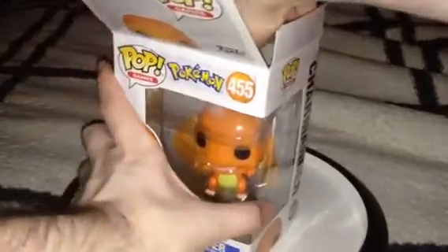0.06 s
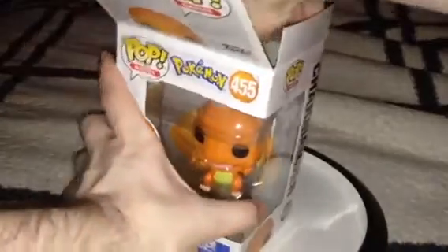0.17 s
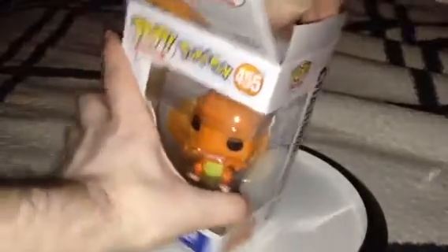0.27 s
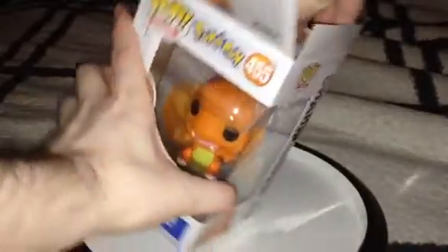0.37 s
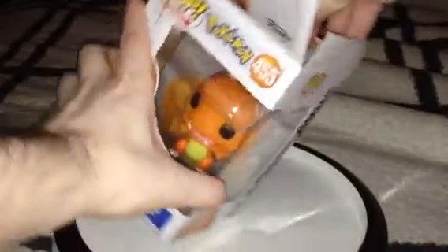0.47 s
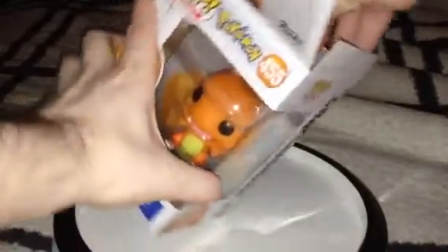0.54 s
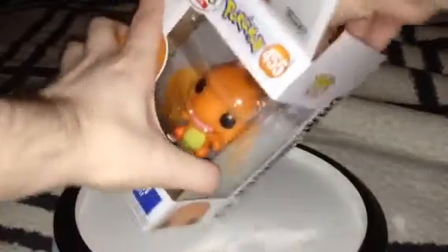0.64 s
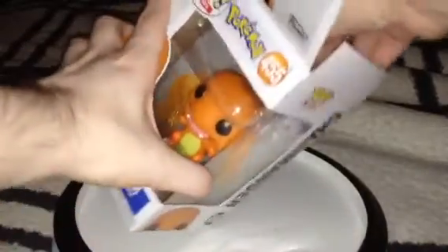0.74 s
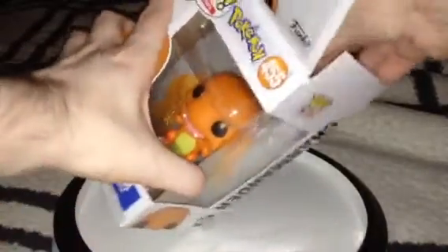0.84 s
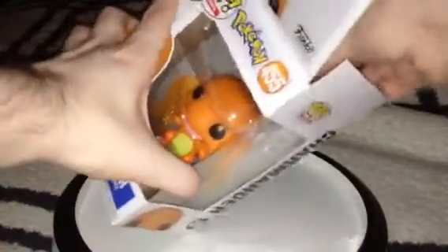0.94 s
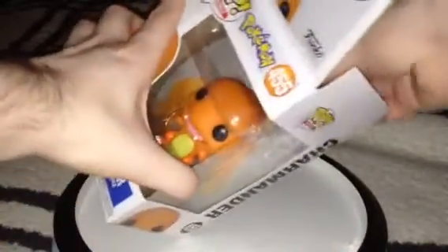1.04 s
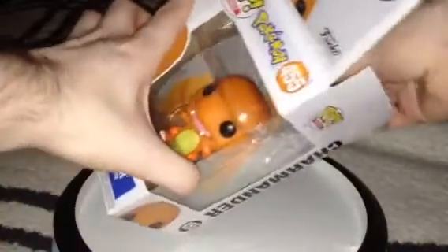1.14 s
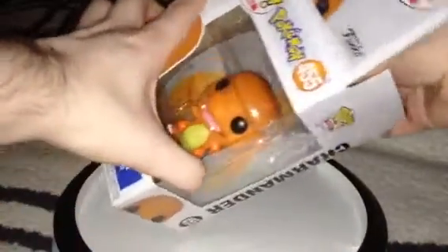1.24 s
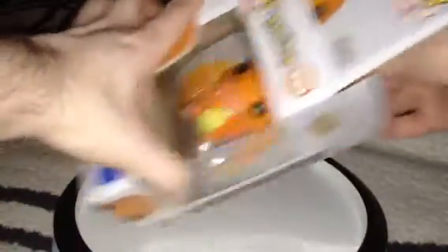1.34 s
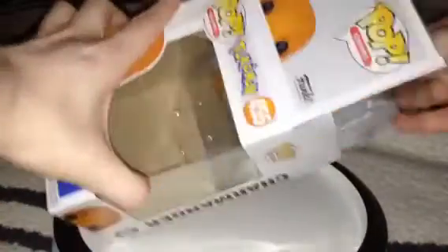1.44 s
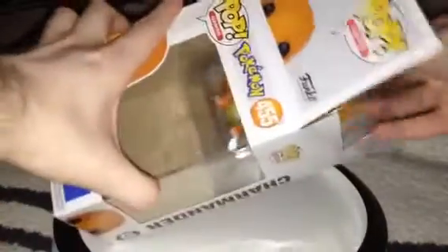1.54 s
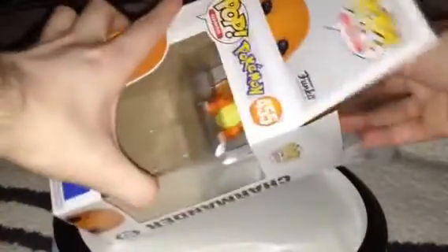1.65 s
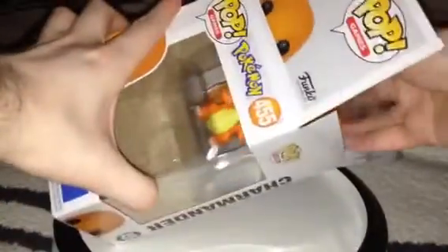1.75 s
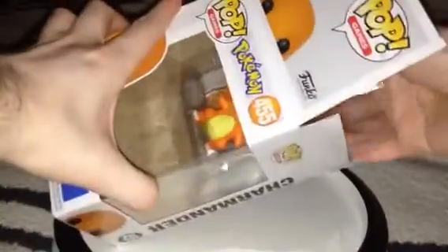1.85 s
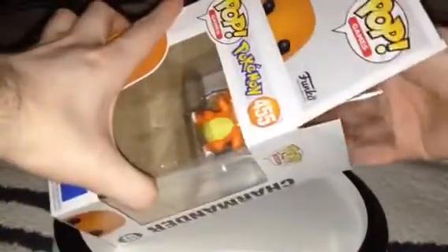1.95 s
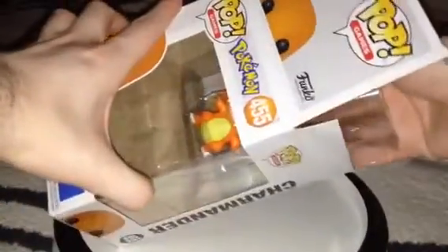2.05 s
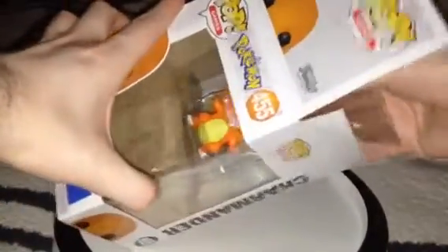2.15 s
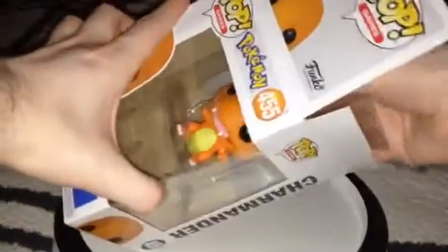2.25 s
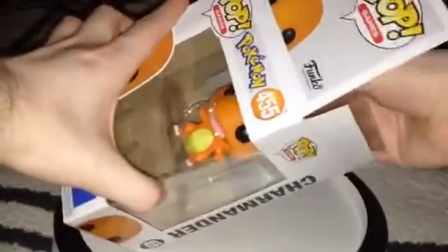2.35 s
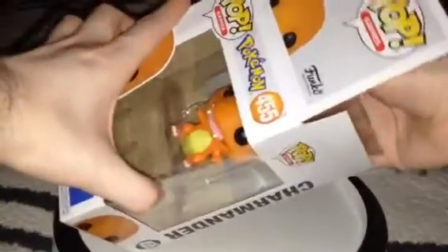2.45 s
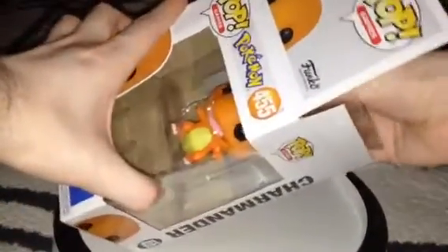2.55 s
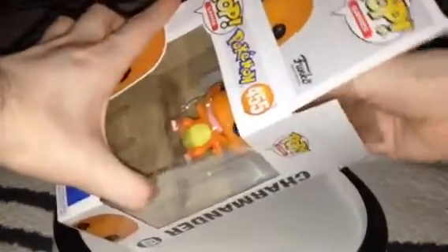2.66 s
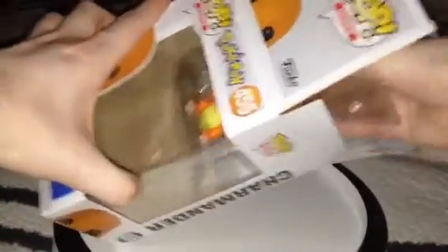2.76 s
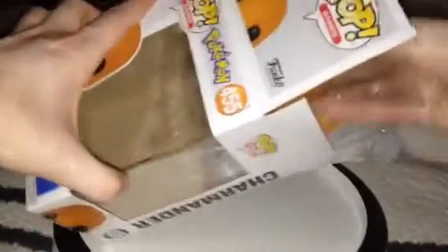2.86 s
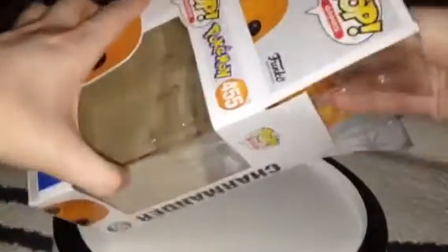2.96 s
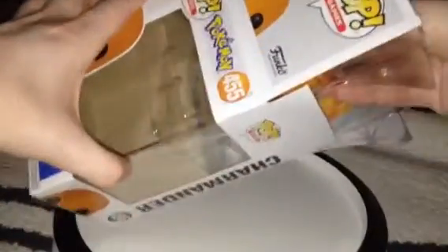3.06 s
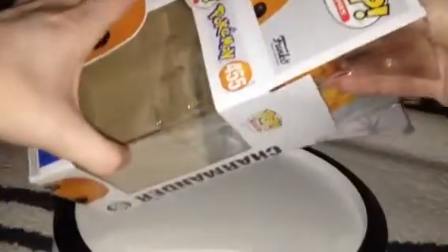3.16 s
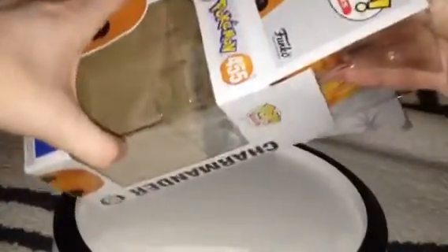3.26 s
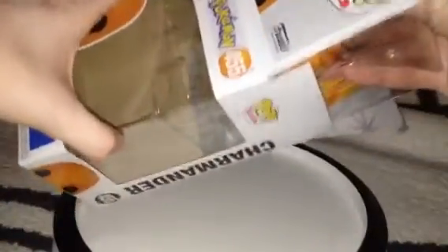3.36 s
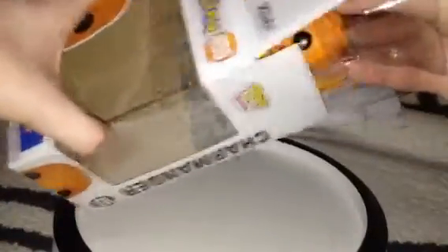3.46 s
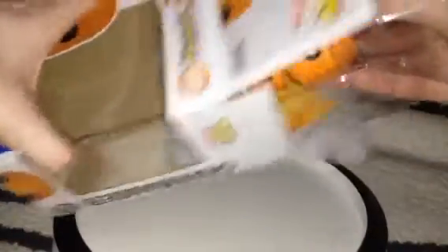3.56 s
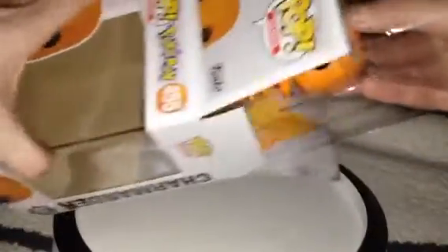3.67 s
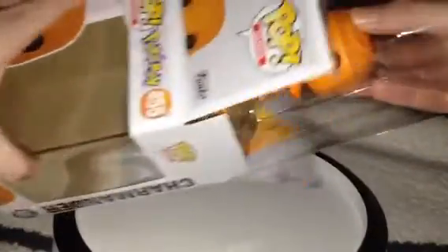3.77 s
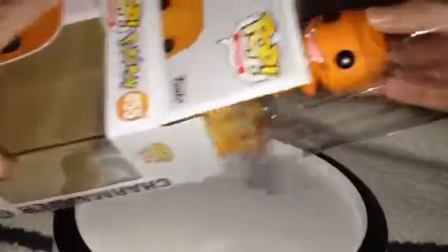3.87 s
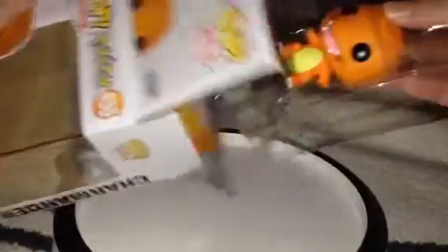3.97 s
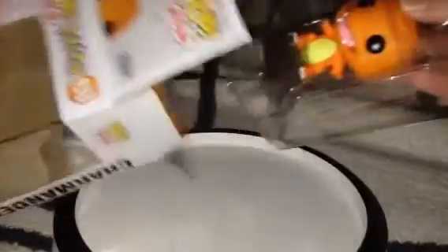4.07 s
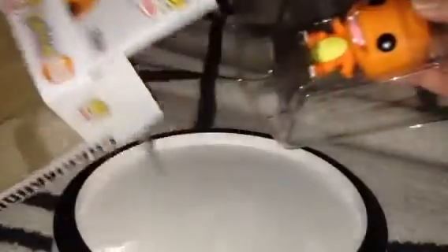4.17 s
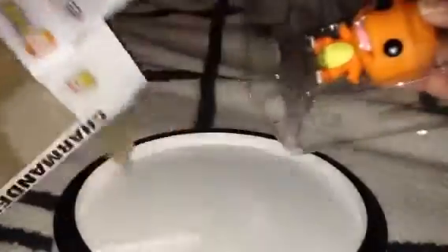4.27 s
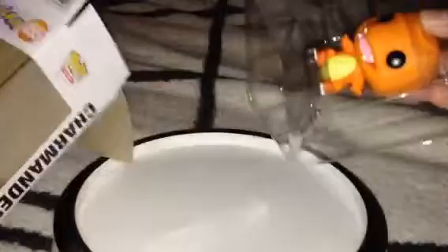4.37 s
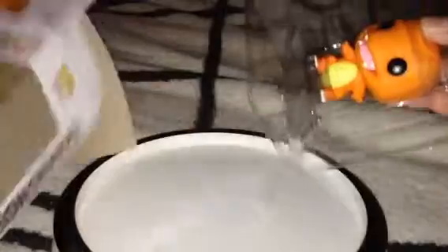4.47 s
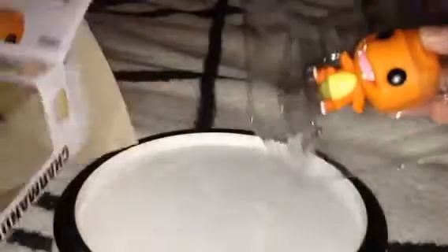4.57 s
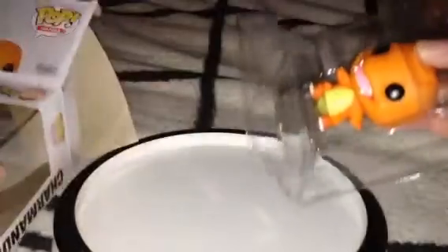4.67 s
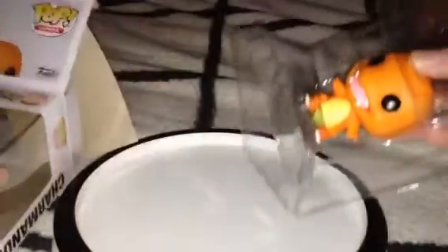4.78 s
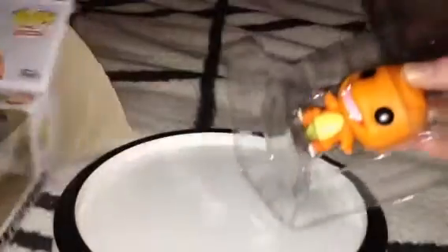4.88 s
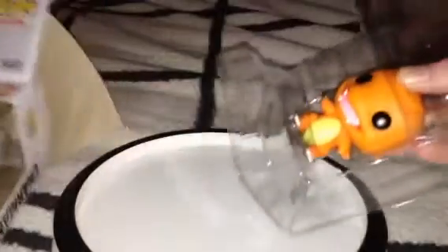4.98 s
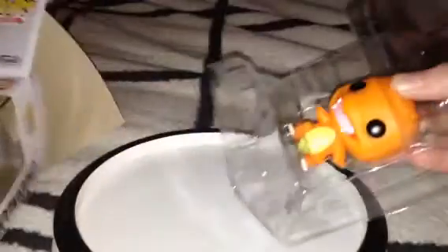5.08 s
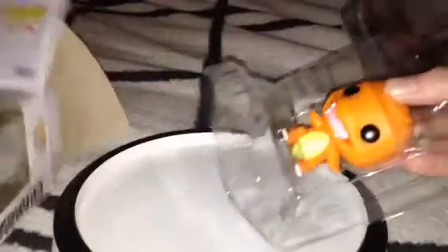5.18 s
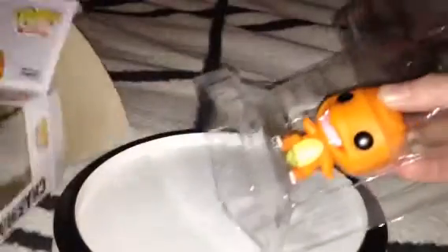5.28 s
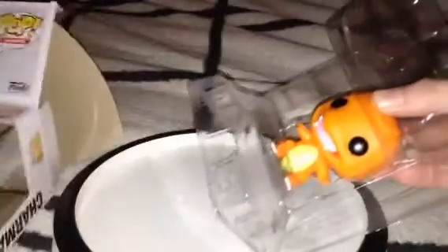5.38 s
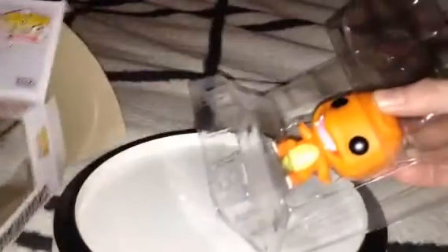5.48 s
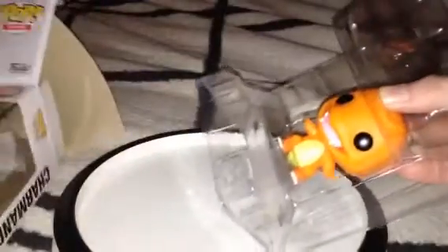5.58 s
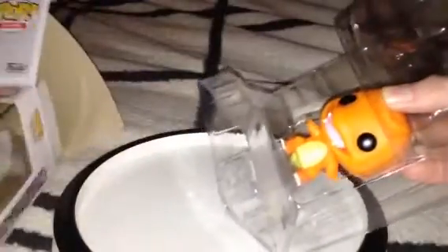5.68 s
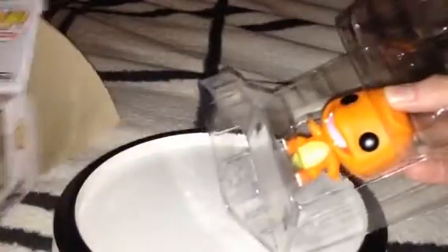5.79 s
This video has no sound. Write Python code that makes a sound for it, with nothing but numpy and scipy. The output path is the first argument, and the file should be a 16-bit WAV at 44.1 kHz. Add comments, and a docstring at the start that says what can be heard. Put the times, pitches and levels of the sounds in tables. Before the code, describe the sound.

Hands handle a cardboard toy box up close; a sharp plastic snap, then scrapes, knocks and crackles as a clear tray slides out.

```python
"""Toy box opened by hand

Hands open a cardboard toy box and work a clear plastic tray out of it, heard close up in a small, soft room.
Card knocks, tray snaps and dry ticks are short noise runs that ring the box; rubs, scrapes and hisses are
stick-slip noise through the same box. Thin gliding squeaks and faint whistles are noise through a narrow
moving resonance. Low panel hums and a room rumble complete it."""
import sys
import numpy as np
from scipy import signal
from scipy.fft import rfft
from scipy.io import wavfile
from scipy.ndimage import uniform_filter1d

SR = 44100
rng = np.random.default_rng(int(sys.argv[2]) if len(sys.argv) > 2 else 0)


def wav_out(sig):
    """Save sig, one row per channel (or a flat mono array), as 16-bit PCM at SR to the path in sys.argv[1]."""
    wavfile.write(sys.argv[1], SR, np.round(np.clip(np.atleast_2d(sig).T, -1, 1) * 32767).astype(np.int16))


N = 256640
SIZE = 4096  # filter design length in samples
HZ = np.fft.rfftfreq(SIZE, 1 / SR)


def amp(db):
    """Decibels to gain."""
    return 10 ** (np.asarray(db) / 20)


def evened(x):
    """Scales to rms 1."""
    return x / np.sqrt(np.mean(x ** 2) + 1e-20)


def read(points, hz):
    """Reads (Hz, value) points on a log-frequency axis."""
    f, value = np.transpose(points)
    return np.interp(np.log(hz + 1), np.log(f + 1), value)


def add(mix, s, sound):
    """Mixes a sound in at time s in seconds."""
    part = mix[max(0, round(s * SR)):][:len(sound)]
    part += sound[:len(part)]


def colour(x, db):
    """Minimum-phase filter with the given gain at each of HZ."""
    log_gain = np.log(amp(np.r_[db, db[-2:0:-1]]))
    taps = np.fft.ifft(np.exp(np.conj(signal.hilbert(log_gain)))).real
    return signal.fftconvolve(x, taps[:SIZE // 2])[:len(x)]


def wander(per_s):
    """Random curve of rms 1: straight lines between per_s random points a second."""
    points = rng.standard_normal(N)
    return evened(np.interp(np.arange(N) * per_s / SR, np.arange(N), points))


def resonate(x, hz, width_hz):
    """Resonance of gain 1 whose pitch may glide: shift to 0 Hz, one-pole low-pass, shift back."""
    turn = np.exp(2j * np.pi * np.cumsum(hz * np.ones(len(x))) / SR)
    r = np.exp(-np.pi * width_hz / SR)
    return 2 * (turn * signal.lfilter([1 - r], [1, -r], x / turn)).real


def patchy(x, depth_db, width_size, time_size):
    """The contact point moves, so short-lived peaks come and go in the spectrum."""
    z = signal.stft(x, nperseg=512)[2]
    patches = uniform_filter1d(rng.standard_normal(z.shape), width_size, 0)
    patches = evened(uniform_filter1d(patches, time_size, 1))
    return signal.istft(z * amp(depth_db * patches), nperseg=512)[1][:len(x)]


def box(x, stretch=1):
    """The push itself plus the box modes it rings, all pitches scaled by stretch."""
    # Modes of the box with the tray in it. Each row: pitch in Hz, gain in dB, t60 in seconds.
    modes = [(302, 2, 0.046), (418.3, -4, 0.021), (563, 6, 0.11), (869, 1, 0.033), (967, 3, 0.047),
             (1066, -4, 0.062), (1374, -3.5, 0.13), (1543, -7.5, 0.052), (1890, -15, 0.2),
             (2360, -4.5, 0.16), (3086, -2.5, 0.0099), (4330, -12, 0.055)]
    out = x.copy()
    for hz, db, t60_s in modes:
        r = np.exp(-np.log(1000) / (t60_s * SR))
        pole = r * np.exp(2j * np.pi * hz * stretch / SR)
        out += amp(db) * 2 * signal.lfilter([1 - r], [1, -pole], x).real
    return out


def room(x, wet_db, echo_db, echo_s=0.019, taps_per_s=1500):
    """Direct sound, one wall echo and a short tail of sparse taps whose decay depends on frequency."""
    # Decay of the room. Each row: frequency in Hz, t60 in seconds.
    room_t60 = [(150, 0.39), (400, 0.15), (1000, 0.15), (2800, 0.1), (8000, 0.17), (15000, 0.039)]
    taps = rng.choice([-1., 1.], 4 * SIZE) * (rng.random(4 * SIZE) < taps_per_s / SR)
    hz, t, z = signal.stft(taps, SR, nperseg=256)
    decay = amp(-60 * t / read(room_t60, hz)[:, None])
    tail = signal.istft(z * decay, SR, nperseg=256)[1]
    tail *= 1 - np.exp(-np.arange(len(tail)) / SR / 0.0029)  # tail builds up over 2.9 ms
    tail *= amp(wet_db) / np.linalg.norm(tail)
    tail[0] += 1
    tail[round(echo_s * SR)] += amp(echo_db)
    return signal.fftconvolve(x, tail)[:len(x)]


def crumple(decay_s, rise_share=0.31):
    """One buckle of a sheet: a quick, dying run of tiny slips, with an even spectrum."""
    t = np.arange(3 * SIZE) / SR
    envelope = (1 - np.exp(-t / (rise_share * decay_s))) * np.exp(-t / decay_s)
    slips = rng.standard_normal(len(t)) * envelope
    power = uniform_filter1d(abs(rfft(slips[:SIZE])) ** 2, size=81)
    return colour(slips, -10 * np.log10(power + 1e-9))


def floor(drone_hz=238, drone_db=-73):
    """Room rumble and hiss that waver a little, with a faint drone."""
    # Spectrum of the room noise. Each row: frequency in Hz, relative level in dB.
    floor_spectrum = [(18, -60), (30, -34.5), (59, -22.5), (140, -1), (237, 2), (324, -7.5), (606, -14),
                      (747, -15), (897, -16.5), (1260, -19), (1550, -15.5), (2070, -21.5), (9940, -29.5),
                      (14300, -26.5), (15500, -29)]
    noise = evened(colour(rng.standard_normal(N), read(floor_spectrum, HZ)))
    air = noise * amp(2.7 * wander(per_s=14))
    drone = wander(per_s=20) * np.sin(2 * np.pi * drone_hz * np.arange(N) / SR)
    return amp(-66.0) * air + amp(drone_db) * drone


def stroke(start_s, length_s, rise_db_per_s=429.5, fall_db_per_s=327.5):
    """Power of one stroke over time: swell up to the start, hold, die away."""
    t = np.arange(N) / SR
    before_s = np.clip(start_s - t, 0, 1)
    after_s = np.clip(t - start_s - length_s, 0, 1)
    return amp(-rise_db_per_s * before_s - fall_db_per_s * after_s) ** 2


def effort():
    """Gain curves of rub, scrape and hiss: pulls, grips and steady holding add in power."""
    # The tray drags along the card; levels are ahead of the trims in sliding().
    # Each row: start in seconds, length in seconds, scrape in dB, rub and hiss in dB against the scrape.
    pulls = [(1.455, 0.068, -43, -10.5, 3.5), (1.57, 0.12, -50, 1.5, -8.5),
             (1.651, 0.055, -46.5, 7.5, -8.5), (1.74, 0.22, -56.5, 7, -8.5), (2.232, 0.023, -42, 4, -12),
             (2.28, 0.071, -54, 5, -4), (2.785, 0.081, -55.5, 2, 0.5), (2.845, 0.19, -51, 6, -8.5),
             (3.39, 0.081, -56.5, 1, -3), (3.487, 0.046, -40.5, -11, -4), (3.56, 0.041, -41.5, 1.5, -14),
             (3.61, 0.264, -54.5, -2.5, -6.5), (4.05, .05, -63, -3, -17.5), (4.335, 0.025, -63.5, -9, -13),
             (4.475, 0.012, -53, 5.5, -9.5), (4.549, .13, -60, 6.5, -2), (4.895, 0.055, -67.5, 2, 1),
             (5.179, 0.014, -60, 0, -3.5), (5.595, 0.019, -58.5, 0, -5.5), (5.785, 0.0067, -60, 0.5, -0.5)]
    # Fingers shift their grip on the card, levels likewise.
    # Each row: start in seconds, length in seconds, rub in dB.
    grips = [(0.032, .05, -59.5), (0.267, 0.19, -60), (0.578, 0.089, -53), (0.779, 0.029, -53.5),
             (1.063, 0.038, -61.5), (1.173, 0.055, -57.5), (1.31, 0.12, -55.5), (2.061, 0.01, -51.5),
             (2.142, 0.028, -54), (2.476, .04, -54.5), (2.684, 0.097, -59.5), (3.18, .015, -55.5),
             (3.275, 0.074, -56.5), (4.135, 0.022, -51), (4.43, 0.031, -59), (4.64, 0.027, -46.5)]
    # Hands that only hold the box, levels likewise: rub, scrape and hiss in dB.
    holding_db = (-73.5, -77, -81.5)
    grip_scrape_db, grip_hiss_db = -8.5, -25  # skin on card is dull: against the rub
    strokes = [(s, length_s, [db + rub_db, db, db + hiss_db]) for s, length_s, db, rub_db, hiss_db in pulls]
    strokes += [(s, length_s, [db, db + grip_scrape_db, db + grip_hiss_db]) for s, length_s, db in grips]
    peak_power = amp([db for _, _, db in strokes]).T ** 2
    power = peak_power @ np.array([stroke(s, length_s) for s, length_s, _ in strokes])
    return np.sqrt(power + amp(holding_db)[:, None] ** 2)


def friction(spectrum, grip_db, slips_per_s, spread_db, smooth_db):
    """Tiny stick-slip clicks of uneven size over a smooth rasp, ringing box and room, at rms 1."""
    size = amp(spread_db * np.minimum(rng.exponential(1, N), 3)) * rng.choice([-1, 1], N)
    clicks = evened(size * (rng.random(N) < slips_per_s / SR))
    drive = (clicks + amp(smooth_db) * rng.standard_normal(N)) * amp(grip_db)
    drive = patchy(drive, depth_db=3.5, width_size=4, time_size=6)
    rung = box(colour(drive, read(spectrum, HZ)))
    return evened(room(rung, wet_db=-7.0, echo_db=-26.0))


def crackles(ticks_per_s=30, spread_db=2):
    """Small buckles of uneven size at random moments, ringing box and room, at rms 1."""
    # Spectrum of a crackle. Each row: frequency in Hz, relative level in dB.
    crackle_spectrum = [(100, -23), (400, -4), (1000, 2.5), (3000, -5), (6000, -6), (15000, -21)]
    size = amp(spread_db * np.minimum(rng.exponential(1, N), 2))
    size = size * (rng.random(N) < ticks_per_s / SR)
    pushes = signal.fftconvolve(size, crumple(decay_s=.0018))[:N]
    rung = box(colour(pushes, read(crackle_spectrum, HZ)))
    return evened(room(rung, wet_db=-7, echo_db=-18))


def sliding(catch_db=2.5):
    """The surfaces catch and let go, so rub, scrape and hiss flutter together; harder strokes crackle more."""
    # Spectra of the three kinds of friction. Each row: frequency in Hz, relative level in dB.
    rub_spectrum = [(30, -49.5), (80, -34), (150, 2), (300, -0.5), (500, 6.5), (1000, 1), (1400, -7.5),
                    (2200, -7), (5000, -39.5)]
    scrape_spectrum = [(300, -22.5), (900, -10), (1500, 1), (2200, 2), (3200, -4), (4800, -6.5),
                       (7000, -19.5), (15000, -37)]
    hiss_spectrum = [(1000, -42.5), (3500, -6), (5200, 0), (8000, -1), (11000, -2.5), (15500, -5.5)]
    rub, scrape, hiss = effort()
    grip_db = catch_db * wander(per_s=150)
    rubbing = rub * friction(rub_spectrum, grip_db, slips_per_s=900, spread_db=7.5, smooth_db=1.5)
    scraping = scrape * friction(scrape_spectrum, grip_db, slips_per_s=600, spread_db=2.5, smooth_db=-2)
    hissing = hiss * friction(hiss_spectrum, 0.49 * grip_db, slips_per_s=470, spread_db=7.0, smooth_db=1)
    crackling = scrape * crackles()
    return amp(-3.0) * rubbing + amp(-2.0) * scraping + amp(-2) * hissing + amp(-11) * crackling


def knocks(events, material, spot_db, ripple_db, dulling, wet_db, echo_db, grip=0.0065, spot_width=0.065):
    """Short noise runs take a material's colour and the ring of one spot, then ring box and room."""
    # Frequencies in Hz at which the colour of a knock is set.
    band_hz = [210, 520, 1100, 2500, 6000, 14000]
    # Colour shared by all knocks. Each row: frequency in Hz, gain in dB.
    knock_shape = [(30, -32.5), (70, -26.5), (130, -3), (200, 0.5), (1400, 1), (2000, 1.5), (3200, 0),
                   (4400, 4), (5200, 4), (6300, 4.5), (8000, 1), (12500, -2.5), (15500, -5.5)]
    out = np.zeros(N)
    attack = SIZE // 8  # the level is the rms of the first 12 ms
    body_db, crack_db, fizz_db = material  # against 1.1 kHz, ahead of the shared colour
    for s, db, hz, weight_db, bright_db, decay_s in events:
        # a heavy blow also fills the body; a sharp one also lifts the fizz
        body = body_db + 0.51 * weight_db
        top = fizz_db + 0.45 * bright_db
        # a dull spot loses the top octave faster than a bright one
        bands = [weight_db, body, 0, crack_db + bright_db, top, top + dulling * (top + 16)]
        spot = read(list(zip(band_hz, bands)), HZ)
        # each spot favours its own few high modes of the sheet
        ripple = evened(uniform_filter1d(rng.standard_normal(len(HZ)), size=45))
        ripple = ripple_db * ripple * HZ / (HZ + 1500)
        push = colour(crumple(decay_s), spot + ripple + read(knock_shape, HZ))
        push = push + amp(spot_db) * resonate(push, hz, spot_width * hz)
        # each knock shifts the box pitches a little at random
        ring = room(box(push, 1 + grip * rng.standard_normal()), wet_db, echo_db)
        add(out, s, amp(db) * ring / np.sqrt(np.mean(ring[:attack] ** 2)))
    return out


def card_knocks():
    """The card buckles or is knocked: strong body, little fizz."""
    # Each row: start in seconds, level in dB, ring of the spot in Hz, weight in dB, brightness in dB,
    # crumple time in seconds.
    card_events = [(0.0946, -49.5, 910, -6, 2.5, 0.0023), (0.174, -45, 551, 1, -16, .005),
                   (0.1855, -43.5, 557, -10, -6, 0.0023), (0.239, -49, 1120, -9, -6, 0.0048),
                   (0.3272, -57, 960, -7, 7, 0.0034), (0.568, -46.5, 420, 6, -8, 0.0034),
                   (0.584, -37.5, 480, -4.5, -9, 0.0011), (0.623, -40.5, 920, -1.5, 7.5, 0.006),
                   (0.6926, -28, 4700, -15.5, 5.5, 0.0021), (0.856, -56.5, 930, -2, -6, .005),
                   (1.4223, -21, 169, -1.5, 6.5, 0.0055), (1.509, -33, 1030, -17, -7, 0.0015),
                   (1.541, -36.5, 480, 4, 7, 0.0076), (1.5992, -44.5, 475, 3, -7, .005),
                   (1.6607, -30.5, 950, -17, 3.5, .004), (1.7085, -42, 700, -27, 2, 0.01),
                   (2.287, -39, 930, -10, 6, 0.0058), (2.551, -33, 4000, -11.5, 12, 0.0044),
                   (2.597, -33, 2020, -13, 6, 0.0052), (2.9531, -38, 530, 14, 2, 0.0042),
                   (3.3761, -46.5, 5600, -30, 14, 0.01), (3.5727, -36, 484, 1, 9, 0.012),
                   (3.8715, -34.5, 2460, -5, 18.5, 0.0026), (4.378, -35, 840, -1.5, -2.5, 0.0085),
                   (4.391, -40.5, 840, 6.5, -5, 0.0048), (4.559, -45, 540, 23, -12, 0.0082),
                   (4.6204, -37, 1490, 18, -3, 0.0013), (4.6256, -29.5, 1360, 1.5, 7.5, 0.0038),
                   (4.704, -42.5, 303, 9.5, -21, 0.0068), (5.3657, -51, 392, 12, -9, 0.0055)]
    return knocks(card_events, (5.7, -10.5, -29.5), spot_db=4.5, ripple_db=2.5, dulling=1.0,
                  wet_db=-9, echo_db=-19.5)


def dry_ticks():
    """Short, dry ticks, even and bright; some stand alone, some add the bright edge of a knock or snap."""
    # Each row: start in seconds, level in dB.
    tick_events = [(0.239, -63.5), (0.256, -69), (.3272, -70), (0.412, -59), (.431, -67), (1.344, -59),
                   (1.3948, -34), (1.407, -26), (1.852, -59), (2.137, -63), (3.007, -50), (3.037, -64),
                   (4.1174, -74), (4.6955, -57)]
    # Tick colour against 1.1 kHz: body, crack and fizz in dB.
    tick_colour = (-2.4, 0, -2.4)
    spot_hz, weight_db, bright_db, decay_s = 3600, -3, 0, .0011
    ticks = [(s, db, spot_hz, weight_db, bright_db, decay_s) for s, db in tick_events]
    return knocks(ticks, tick_colour, spot_db=0.5, ripple_db=-0.5, dulling=0.62,
                  wet_db=-13.5, echo_db=-26.5)


def tray_snaps():
    """The plastic tray snaps: less body, more crack and fizz than card."""
    # Each row: start in seconds, level in dB, ring of the spot in Hz, weight in dB, brightness in dB,
    # crumple time in seconds.
    tray_events = [(0.909, -52, 510, 0, -7, 0.0037), (1.211, -56, 1780, -3, -1, .003),
                   (1.3134, -56, 1680, -11, -5, .004), (1.3587, -56.5, 1790, -14, -3, .003),
                   (1.408, -19.5, 3180, -2.5, 2.5, 0.0038), (1.479, -47, 700, -4, 15, 0.002),
                   (1.9091, -43.5, 980, 0, 1, 0.0014), (2.2142, -39, 890, -2, -5, 0.0027),
                   (2.2242, -38.5, 853, 5, -3.5, 0.0067), (2.4963, -56, 3940, -10, 0, 0.0024),
                   (2.5445, -45, 575, 0, 2, .0015), (2.6498, -48.5, 3620, -5, 3, 0.00093),
                   (2.847, -47, 3220, 8, -1, 0.0041), (3.5047, -29.5, 3200, -4, 5.5, 0.007),
                   (3.527, -29.5, 2330, -2, 11, 0.0034), (3.562, -29.5, 2130, -5, 4, 0.0024),
                   (3.856, -44.5, 2360, 10, -10, 0.0034), (4.0002, -50.5, 522, 9, -3, 0.0091),
                   (4.0248, -50.5, 1050, 4, -4, 0.0046), (4.1189, -41.5, 1890, 11.5, -3, 0.0033),
                   (4.6948, -43, 525, 8.5, -6, 0.0055)]
    return knocks(tray_events, (2, 0, -13.5), spot_db=5.0, ripple_db=1.0, dulling=0.92,
                  wet_db=-8.5, echo_db=-19)


def squeaks_and_whistles():
    """Thin gliding squeaks and faint whistles: noise through one narrow moving resonance."""
    # Each row: start in seconds, end in seconds, start pitch in Hz, end pitch in Hz, width in Hz, level in dB.
    glides = [(2.846, 2.937, 920, 880, 90, -54), (2.97, 3.037, 2040, 1900, 160, -58),
              (3.025, 3.057, 1250, 1290, 50, -54), (3.362, 3.448, 1300, 1110, 130, -57.5),
              (3.464, 3.508, 5300, 9600, 1200, -50), (4.458, 4.49, 2050, 2350, 307, -60),
              (4.482, 4.7, 4970, 5300, 700, -73), (5.619, 5.76, 2520, 2300, 200, -75)]
    out = np.zeros(N)
    for start_s, end_s, from_hz, to_hz, width_hz, db in glides:
        hz = np.linspace(from_hz, to_hz, max(round((end_s - start_s) * SR), SIZE // 16))
        tone = resonate(rng.standard_normal(len(hz)), hz, width_hz)
        tone = resonate(tone, hz, 2 * width_hz)
        add(out, start_s, amp(db) * evened(tone * signal.windows.tukey(len(hz), .8)))
    return room(out, wet_db=-9.5, echo_db=-29)


def hums():
    """A freed card panel swings on at one low pitch: a decaying sine with a soft onset."""
    # Each row: start in seconds, pitch in Hz, level in dB, t60 in seconds.
    hum_events = [(3.562, 198, -37.5, 0.35), (3.869, 196, -57.5, 1.5), (4.631, 238, -68, 1.7)]
    out = np.zeros(N)
    t = np.arange(SR) / SR
    for s, hz, db, t60_s in hum_events:
        swing = np.exp(-np.log(1000) * t / t60_s) * (1 - np.exp(-t / 0.012))
        add(out, s, amp(db) * swing * np.sin(2 * np.pi * hz * t))
    return out


def scene():
    """All sources at one microphone."""
    handling = sliding() + card_knocks() + dry_ticks() + tray_snaps()
    return (floor() + handling + squeaks_and_whistles() + hums())[None]


def record(dry, edge_hz=15450):
    """The recorder's band limit: a steep linear-phase low-pass."""
    taps = signal.firwin(511, edge_hz, window=("kaiser", 9), fs=SR)
    return signal.oaconvolve(dry, taps[None], "same")


dry = scene()
out = record(dry)
wav_out(out)
```